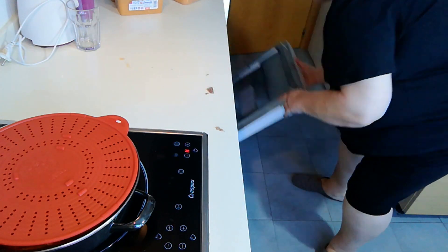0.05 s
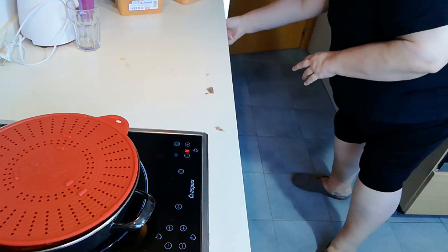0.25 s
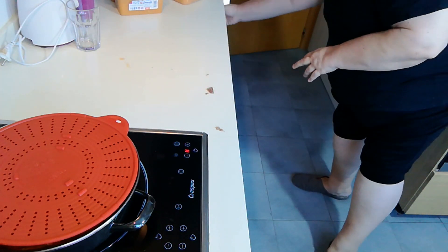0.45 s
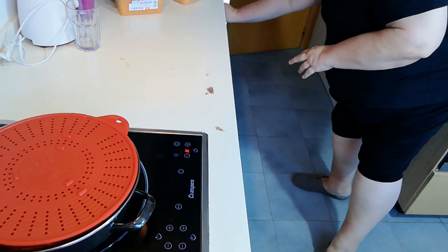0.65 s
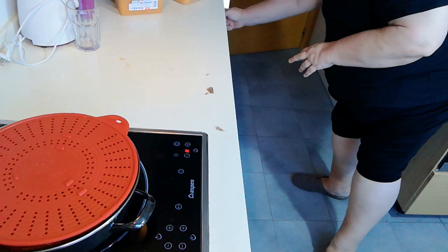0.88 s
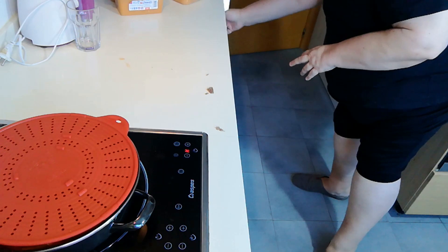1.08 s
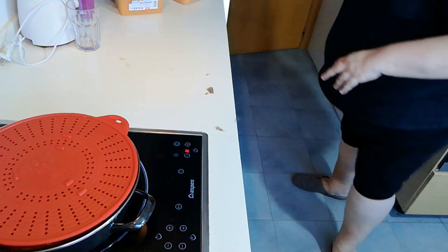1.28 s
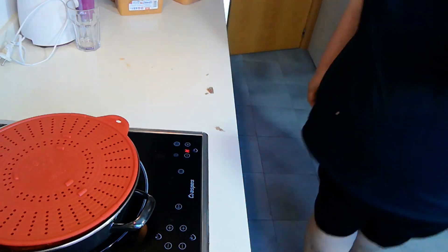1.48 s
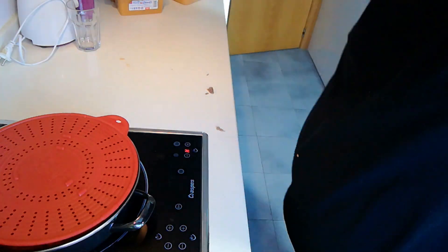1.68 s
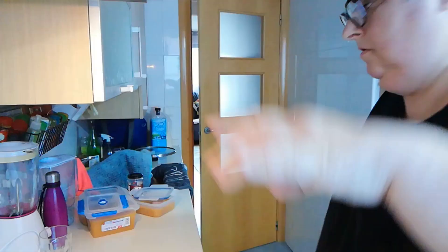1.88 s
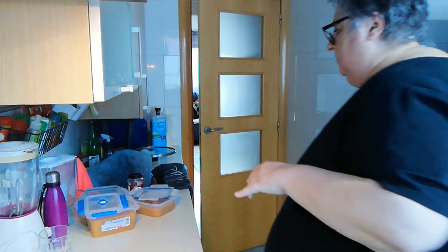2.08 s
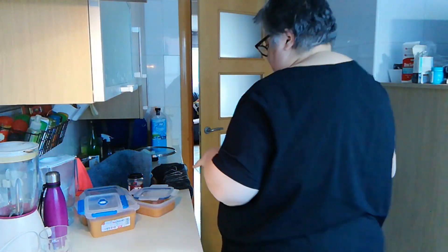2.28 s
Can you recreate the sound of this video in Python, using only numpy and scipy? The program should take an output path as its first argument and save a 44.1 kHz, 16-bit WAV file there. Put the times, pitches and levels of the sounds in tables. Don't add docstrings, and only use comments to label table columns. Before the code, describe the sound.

Dishwasher rack pushed in with a short squeak and double clunk, then a low motor drone

```python
import sys
import numpy as np
from scipy import signal
from scipy.fft import rfft, irfft
from scipy.io import wavfile

SR = 44100
rng = np.random.default_rng(int(sys.argv[2]) if len(sys.argv) > 2 else 0)


def master(y):
    cut = np.clip(np.atleast_2d(y).T, -1, 1)
    pcm = np.round(cut * 32767)
    wavfile.write(sys.argv[1], SR, pcm.astype(np.int16))


def amplitude_ratio(level_db):
    exponent = np.asarray(level_db, float) / 20
    return 10 ** exponent


N = 103458
T = np.arange(N) / SR
HZ = np.maximum(np.arange(N // 2 + 1) * SR / N, 1)

# frequency in Hz, level in dB rms.
MAINS_LINES = [(150.7, -79.5), (231.5, -76), (301.5, -66.5), (382.2, -75), (473.7, -74), (608.3, -78),
               (1211, -73), (1701, -85), (2121, -78), (2272, -88.5), (2369, -84.5)]
# multiple of DRONE_HZ, level in dB rms.
DRONE_ORDERS = [(1, -60.5), (2, -66), (3, -53), (4, -65.5), (5, -72.5), (6, -70.5), (7, -73), (8, -90),
                (9, -67.5), (10, -80)]
# multiple of DRONE_HZ, level in dB rms.
DRONE_HIGH_ORDERS = [(11, -78), (13, -71.5), (15, -83), (17, -69), (21, -73)]
# time in seconds, gain in dB.
DRONE_SWELL_DB = [(1.19, -41), (1.23, 4.5), (1.275, 10), (1.285, -3), (1.5, -0.5), (1.65, 2.5), (1.83, 2),
                  (1.89, 8)]
# frequency in Hz, level in dB rms.
MOTOR_LINES = [(161.5, -52.5), (323.0, -60), (484.5, -52.5), (646.0, -65), (807.5, -70.5), (969.0, -68.5),
               (1130, -70.5), (1292, -78), (1453, -67.5), (1615, -72), (1776, -71)]
# multiple of its lowest line, level in dB rms.
MOTOR_HIGH_ORDERS = [(13, -75), (15, -85), (16, -76), (17, -72), (21, -77), (25, -76.5)]
# frequency in Hz, density in dB per Hz.
ROOM_SPECTRUM = [(25, -9), (180, -12), (300, -6.5), (800, -8.5), (950, -16), (1900, -17.5), (2350, -15),
                 (2800, -18), (14500, -27.5), (16000, -26)]
# time in seconds, level in dB.
ROOM_LEVEL_DB = [(0, -62.5), (.3, -61), (.45, -67.5), (1.19, -67.5), (1.21, -62), (1.88, -62), (2.02, -67),
                 (2.1, -59), (2.35, -56)]
# frequency in Hz, density in dB per Hz.
RUSH_SPECTRUM = [(60, -28), (190, -18), (250, -7), (800, -12.5), (1050, -18.5), (2300, -21.5), (3000, -21),
                 (16000, -32)]
# time in seconds, level in dB.
RUSH_LEVEL_DB = [(1.19, -104), (1.21, -71.5), (1.45, -57.5), (1.6, -57.5), (1.88, -56.5), (2.01, -58.5),
                 (2.1, -60.5), (2.35, -62.5)]
# frequency in Hz, gain in dB.
FAR_ROOM_DB = [(60, 1), (2000, -1.5), (5200, 0), (7500, -4), (10500, 4), (16000, 2.5)]
# start
# in seconds, level in dB, hold in seconds, centre in Hz, width in Hz.
GLINT_EVENTS = [(0.09, -68, 0.01, 5030, 470), (0.17, -52, 0.019, 4230, 920),
                (0.2065, -40.5, 0.016, 8300, 900), (0.207, -36, 0.0089, 12500, 3800),
                (0.216, -50, 0.0067, 12400, 950), (0.2654, -32.5, 0.011, 6000, 2000),
                (0.268, -37, 0.008, 13570, 1100), (0.736, -70, 0.012, 7800, 600),
                (0.76, -68, 0.01, 7900, 610), (0.801, -68, 0.015, 7800, 760), (0.0, -75, 1.25, 2363, 34),
                (0.285, -44, 0.017, 3000, 2300), (1.274, -67.5, 0.14, 1652, 11.5),
                (1.388, -61.5, 0.066, 2360, 27), (1.78, -64, 0.12, 2122, 14), (1.286, -66, 0.2, 2290, 360),
                (1.63, -57, 0.0076, 5090, 310), (1.624, -53, 0.0098, 6080, 480),
                (1.623, -52.5, 0.0071, 7000, 520), (1.626, -56.5, 0.0074, 8850, 500),
                (1.624, -50, 0.014, 2600, 1130), (1.79, -65, 0.045, 5840, 160),
                (1.861, -65, 0.04, 6100, 250), (2.04, -64.5, 0.25, 202.6, 8.8),
                (2.265, -60.5, 0.022, 4900, 1300), (2.285, -74, 0.03, 6150, 300)]
# frequency in Hz, density in dB per Hz.
RUSTLE_SPECTRUM = [(350, -79), (600, 2), (944, -13), (1230, -1.5), (2830, -12), (4340, -7.5), (7830, -8.5),
                   (16000, -18)]
# start in seconds, level in dB, hold in seconds, T60 in seconds.
RUSTLE_EVENTS = [(0.055, -61.5, 0.025, 0.085), (0.103, -58.5, 0.014, 0.035), (0.478, -70, 0.04, .08),
                 (0.58, -62, 0.023, 0.082), (0.631, -66, 0.02, 0.11), (0.737, -63, 0.022, 0.062),
                 (0.771, -64, 0.012, 0.044), (0.798, -61.5, 0.027, 0.042), (0.866, -62, 0.012, 0.041),
                 (0.897, -57, 0.014, 0.049), (1.163, -61, 0.012, 0.086), (1.327, -60.5, 0.024, 0.044),
                 (1.498, -63, 0.013, 0.068), (1.625, -55, 0.02, 0.047), (2.279, -62, 0.012, 0.07)]
# frequency in Hz, density in dB per Hz.
SCRAPE_SPECTRUM = [(88, -31.5), (150, -29), (494, -1), (1240, -1), (2920, -9), (4490, -2.5), (5150, -3.5),
                   (16000, -11.5)]
# start in seconds, level in dB, hold in seconds, T60 in seconds.
SCRAPE_EVENTS = [
    (0.1464, -43.5, 0.015, 0.093),
    (1.198, -52.5, 0.028, 0.26),
]
# start in seconds, peak in dB, frequency in Hz, T60 in seconds.
KNOCK_EVENTS = [(0.153, -49.5, 1190, 0.18), (0.206, -34, 1022, 0.06), (0.2135, -23.5, 669, 0.067),
                (0.212, -29.5, 1450, 0.036), (0.216, -31.5, 377.5, 0.16), (0.236, -38, 646, 0.07),
                (0.249, -43, 1622, 0.12), (0.269, -33, 1244, 0.05), (0.27, -30.5, 1695, 0.05),
                (0.273, -23, 234.4, 0.078), (0.289, -26, 304, 0.049), (0.29, -34, 687.3, 0.1),
                (0.292, -42.5, 1210, 0.046), (0.298, -46.5, 2625, 0.11), (0.316, -39.5, 591.4, 0.14),
                (0.344, -45.5, 232.3, 0.18), (1.232, -46, 1440, 0.08), (1.234, -44.5, 914, 0.07),
                (1.265, -48, 1450, 0.05)]
# time in seconds, pitch in Hz, level in dB.
SQUEAK_TRACK = [(.160, 764, -66.5), (.170, 829, -48.5), (.182, 752, -41.5), (.192, 795, -36),
                (.203, 734, -49), (.207, 770, -79)]
# start in seconds, crack in dB, rack in dB, cabinet in dB, hold in seconds.
BLOW_EVENTS = [
    (0.2024, -37.5, -34.5, -52.5, 0.021),
    (0.209, -48.5, -26.5, -47.5, 0.003),
    (0.221, -39.5, -38, -43.5, 0.018),
    (0.246, -50.5, -37.5, -38.5, 0.022),
    (0.2651, -27, -39, -32, 0.013),
    (0.284, -40, -42.5, -27, 0.018),
    (0.316, -75.5, -47, -48, 0.026),
    (1.196, -67, -42.5, -76, 0.024),
    (1.233, -59.5, -46.5, -94, 0.08),
]
# frequency in Hz, density in dB per Hz.
CRACK_SPECTRUM = [(590, -36), (1000, -18), (1230, 5.5), (2050, -11.5), (4020, -12), (5830, -8), (8960, -13),
                  (13100, -13), (16000, -8)]
# frequency in Hz, share in dB, T60 in seconds.
RACK_MODES = [(358, -7, 0.15), (551.4, -7, 0.15), (650, -1.5, 0.037), (955, -17.5, 0.075),
              (1165, -15.5, 0.021), (1476, -11.5, 0.025), (1720, -16, 0.0067), (2190, -10.5, 0.0067),
              (2580, -25.5, 0.077)]
# frequency in Hz, share in dB, T60 in seconds.
CABINET_MODES = [(65.6, -20, 0.34), (167, -8, 0.19), (230.7, -2.5, 0.19), (299.8, 0, 0.13),
                 (379, -10.5, 0.2), (534.6, -5.5, 0.16), (588, -14.5, 0.15), (671, -12.5, 0.077)]
# frequency in Hz, left-right likeness from 0 to 1.
STEREO_LIKENESS = [(60, 0.92), (300, 0.98), (800, 0.91), (1500, 0.35), (3000, 0.25), (8000, 0.2),
                   (15000, 0.26)]
# frequency in Hz, lead of left in radians.
LEFT_LEAD_RAD = [(20, -0.5), (1460, 0.38), (3360, -4), (5430, -1), (6030, -6.5), (10900, -2), (12100, -7.5),
                 (16500, -10.5)]
# frequency in Hz, left minus right in dB.
LEFT_LEAN_DB = [(60, 0.5), (380, 0.5), (2380, 0.5), (15000, 2)]

DRONE_HZ, FULL_SPEED_S = 236, 1.71
LOW_ORDER_LATE_S, LOW_ORDER_EARLY_DB = 1.6, -19
SQUEAK_FALL_DB = 9.5
ATTACK_S, CRACK_RISE_S, KNOCK_RISE_S = 0.0018, 0.001, 0.0021
CRACK_T60_S, BODY_T60_S, GLINT_T60_S, CLICKS_PER_S = 0.033, 0.071, 0.068, 3000
THUD_CUT_S = 1.273
GAP_START_S, GAP_END_S = 1.8865, 2.0125
OFFSET, STEP_S, SETTLE_S = -0.023, 0.00005, 0.035
TREBLE_DB, CUTOFF_HZ = 3.5, 15900


def rms_one(x):
    return x / np.sqrt(np.mean(x ** 2) + 1e-20)


def in_time(rows, column=1):
    rows = np.array(rows)
    return np.interp(T, rows[:, 0], rows[:, column])


def at_hz(points):
    points = np.array(points)
    return np.interp(np.log(HZ), np.log(points[:, 0]), points[:, 1])


def drift(rate_hz):
    r = np.exp(-2 * np.pi * rate_hz / SR)
    walk = signal.lfilter([1], [1, -2 * r, r * r], rng.standard_normal(N + SR))
    return rms_one(walk[SR:])


def grit(spread_db):
    grain_db = spread_db * np.minimum(rng.exponential(1, N), 5)
    return rms_one(rng.standard_normal((2, N)) * amplitude_ratio(grain_db))


def filtered(x, spectrum):
    return irfft(rfft(x) * amplitude_ratio(at_hz(spectrum)), N)


def coloured(x, spectrum):
    return rms_one(filtered(x, spectrum))


def burst(start_s, db, hold_s, t60_s, attack_s=ATTACK_S):
    t = T - start_s
    fall_db = 60 * np.clip(t - hold_s, 0, 3 * t60_s) / t60_s
    return np.clip(t / attack_s, 0, 1) * amplitude_ratio(db - fall_db) * (t < hold_s + 3 * t60_s)


def tones(lines, wobble_db, rate_hz):
    out = 0
    for hz, db in lines:
        level = amplitude_ratio(db + 2.0 + wobble_db * drift(rate_hz))
        out = out + level * np.sin(2 * np.pi * hz * T + rng.uniform(0, 6.0, (2, 1)))
    return out


def orders(base_hz, rows):
    return [(k * base_hz, db) for k, db in rows]


def hum():
    late = np.clip((LOW_ORDER_LATE_S - T) / 0.2, 0, 1)
    low = tones([(DRONE_HZ, DRONE_ORDERS[0][1])], wobble_db=2.5, rate_hz=13.0)
    low = low * amplitude_ratio(LOW_ORDER_EARLY_DB * late)
    middle = tones(orders(DRONE_HZ, DRONE_ORDERS[1:4]), wobble_db=1.2, rate_hz=25.0)
    upper = tones(orders(DRONE_HZ, DRONE_ORDERS[4:]), wobble_db=1.0, rate_hz=3.0)
    drone = (low + middle) * amplitude_ratio(in_time(DRONE_SWELL_DB)) + upper * (T > THUD_CUT_S)
    mains_db = 0.5 * np.clip(in_time(ROOM_LEVEL_DB) + 64.0, 0, 9)
    mains = tones(MAINS_LINES, wobble_db=2.7, rate_hz=2.8) * amplitude_ratio(mains_db)
    motor = tones(MOTOR_LINES, wobble_db=0.8, rate_hz=20.0)
    return np.where(T < GAP_END_S, mains + drone, motor)


def air():
    room = coloured(grit(0), ROOM_SPECTRUM) * amplitude_ratio(in_time(ROOM_LEVEL_DB) + 0.18 * drift(4.1))
    rush = coloured(grit(0), RUSH_SPECTRUM) * amplitude_ratio(in_time(RUSH_LEVEL_DB) + 0.26 * drift(4.0))
    both = room + rush
    return np.where(T < GAP_END_S, both, filtered(both, FAR_ROOM_DB))


def glints():
    out, noise = 0, grit(1.5)
    for start_s, db, hold_s, hz, width_hz in GLINT_EVENTS:
        edges_hz = [hz - width_hz / 2, hz + width_hz / 2]
        band = signal.butter(2, edges_hz, "band", fs=SR, output="sos")
        ring = rms_one(signal.sosfilt(band, noise))
        out = out + ring * burst(start_s, db, hold_s, GLINT_T60_S)
    return out


def rustles():
    fine = coloured(grit(1.1), RUSTLE_SPECTRUM) * sum(burst(*row, attack_s=0.0034) for row in RUSTLE_EVENTS)
    coarse = coloured(grit(0.73), SCRAPE_SPECTRUM) * sum(burst(*row) for row in SCRAPE_EVENTS)
    return fine + coarse


def knocks():
    out = 0
    for start_s, db, hz, t60_s in KNOCK_EVENTS:
        phase = rng.uniform(0, 2 * np.pi, (2, 1)) + 0.35 * drift(60)
        wave = np.sin(2 * np.pi * hz * (T - start_s) + phase)
        out = out + wave * burst(start_s, db, KNOCK_RISE_S, t60_s, attack_s=KNOCK_RISE_S)
    return out * np.clip((THUD_CUT_S - T) / 0.001, 0, 1)


def squeak():
    turn = 2 * np.pi * np.cumsum(in_time(SQUEAK_TRACK) * (1 + 0.014 * drift(120))) / SR
    wave = -np.cos(turn)
    for k in range(9):
        overtone_db = -12.0 - SQUEAK_FALL_DB * k ** 0.4 + 3.5 * drift(120)
        wave = wave - amplitude_ratio(overtone_db) * np.cos((k + 2) * turn)
    slipping = (T > SQUEAK_TRACK[0][0]) * (T < SQUEAK_TRACK[-1][0])
    return amplitude_ratio(in_time(SQUEAK_TRACK, column=2) + 3.5) * wave * slipping


def struck(modes, column):
    force = sum(burst(row[0], row[column], row[4], BODY_T60_S) for row in BLOW_EVENTS)
    out = 0
    for hz, db, t60_s in modes:
        clicks = grit(0.55) * (rng.random(N) < CLICKS_PER_S / SR) * force
        r = amplitude_ratio(-60 / (np.clip(t60_s, 0.01, 0.12) * SR))
        w = 2 * np.pi * hz / SR
        mid, side = signal.lfilter([1, 0, -1], [1, -2 * r * np.cos(w), r * r], clicks + 1e-18)
        out = out + amplitude_ratio(db - 5.5) * np.array([rms_one(mid), rms_one(side)])
    return out * np.sqrt(np.mean(force ** 2))


def blows():
    envelope = sum(burst(row[0], row[1], row[4] * 0.98, CRACK_T60_S, attack_s=CRACK_RISE_S)
                   for row in BLOW_EVENTS)
    crack = coloured(grit(0.97), CRACK_SPECTRUM) * envelope
    ringing = struck(RACK_MODES, column=2) + struck(CABINET_MODES, column=3)
    return (crack + ringing) * np.clip((THUD_CUT_S - T) / 0.0014, 0, 1)


def overtones():
    high = tones(orders(DRONE_HZ, DRONE_HIGH_ORDERS), wobble_db=1.5, rate_hz=5.0)
    high = high * np.clip((T - FULL_SPEED_S) / 0.1 + 1, 0, 1)
    lower = tones(orders(MOTOR_LINES[0][0], MOTOR_HIGH_ORDERS), wobble_db=1.5, rate_hz=5.0)
    return np.where(T < GAP_END_S, high, lower)


def scene():
    total = hum() + air() + glints() + rustles() + knocks() + squeak() + blows() + overtones()
    mid, side = rfft(total) * amplitude_ratio(TREBLE_DB * np.clip(HZ / 2500, 0, 1))
    alike = np.clip(at_hz(STEREO_LIKENESS), 0, 1)
    mid = mid * np.sqrt((1 + alike) / 2)
    side = side * np.sqrt((1 - alike) / 2)
    tilt = amplitude_ratio(at_hz(LEFT_LEAN_DB) / 2) * np.exp(0.5j * at_hz(LEFT_LEAD_RAD))
    return irfft(np.array([(mid + side) * tilt, (mid - side) / tilt]) * (HZ < CUTOFF_HZ), N)


def roll_off(x):
    return signal.sosfilt(signal.butter(12, 16850, fs=SR, output="sos"), x)


def record(dry):
    since_s = T - GAP_END_S
    live = (T < GAP_START_S) | (T > GAP_END_S)
    offset = np.clip(since_s / STEP_S, 0, 1) * OFFSET * np.exp(-np.maximum(since_s, 0) / SETTLE_S)
    return roll_off(dry * live + offset)


dry = scene()
out = record(dry)
master(out)
```